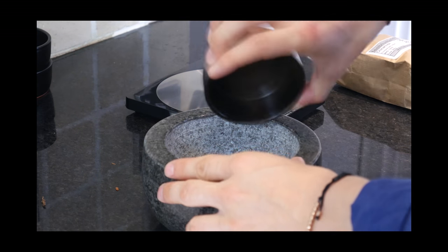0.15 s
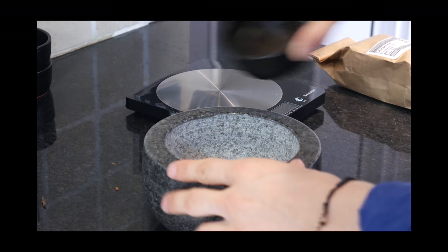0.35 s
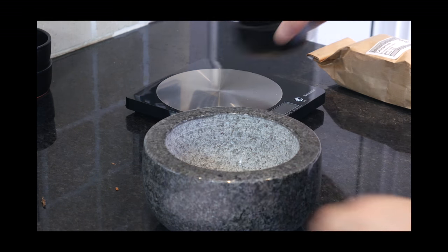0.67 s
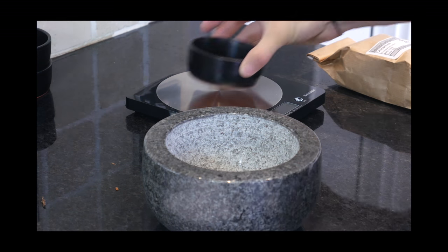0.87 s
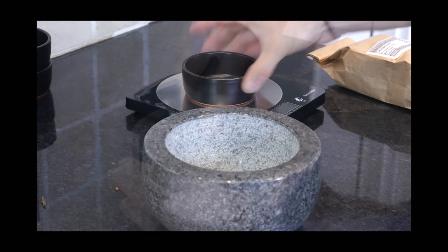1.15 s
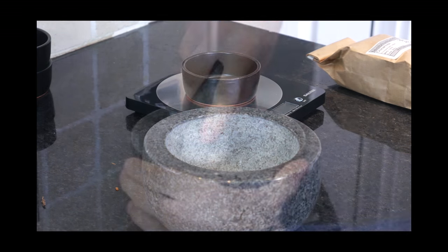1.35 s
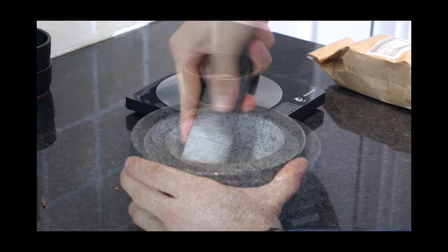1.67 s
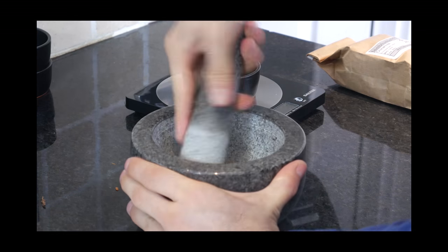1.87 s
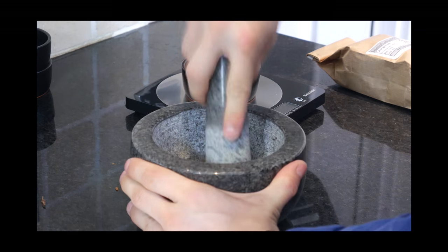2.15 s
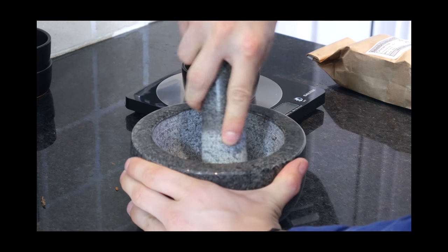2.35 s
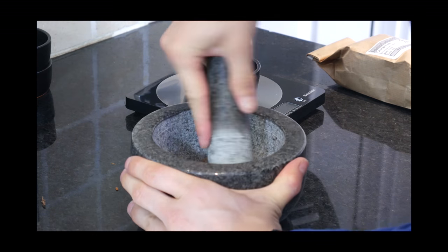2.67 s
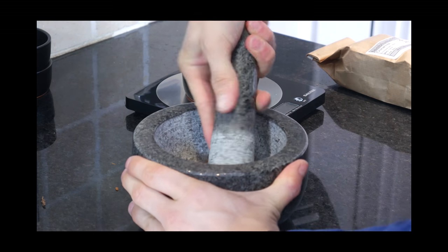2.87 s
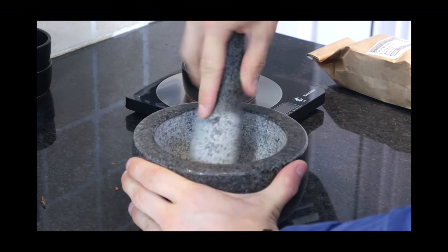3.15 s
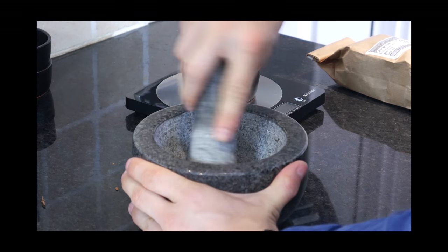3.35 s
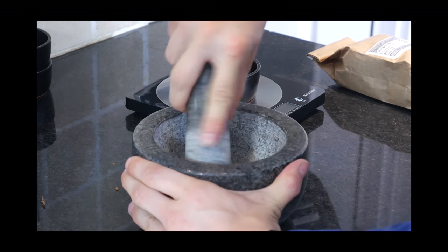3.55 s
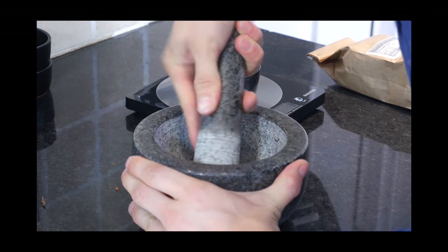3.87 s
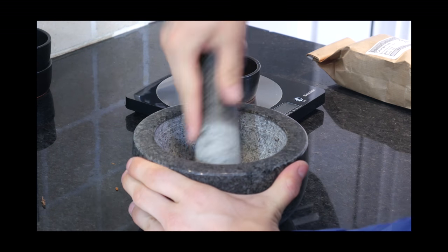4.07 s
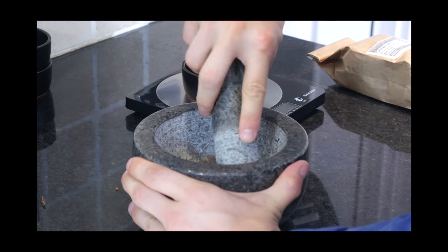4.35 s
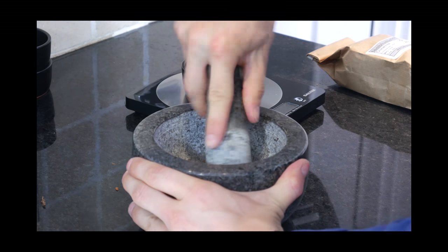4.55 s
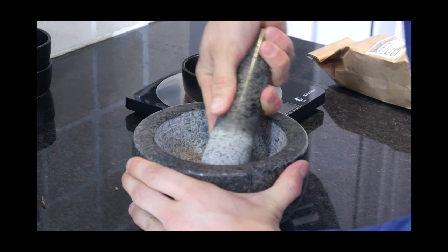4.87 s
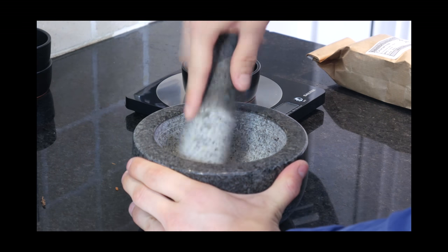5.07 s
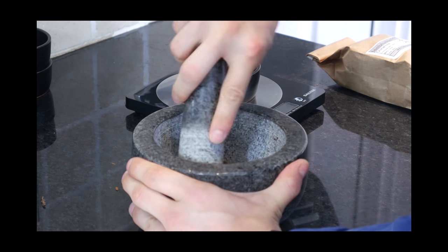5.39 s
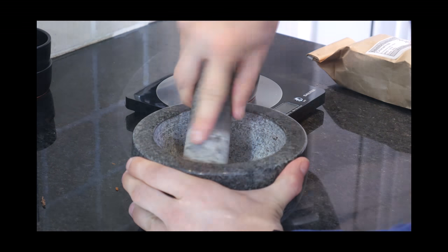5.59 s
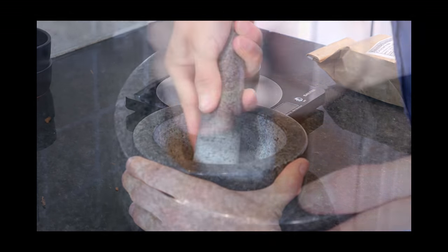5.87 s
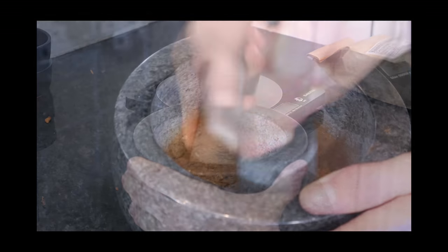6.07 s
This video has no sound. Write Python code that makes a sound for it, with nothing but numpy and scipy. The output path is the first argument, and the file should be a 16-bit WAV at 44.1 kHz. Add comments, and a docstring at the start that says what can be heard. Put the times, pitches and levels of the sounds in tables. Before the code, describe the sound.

Faint room hiss runs throughout in a hard kitchen with a short echo, heard through a nearby stereo microphone. A soft bump comes at about 0.6 seconds, and at 1.1 a small bowl clatters briefly onto a kitchen scale. From 1.5 seconds a stone pestle works dry bark in a stone mortar, starting with light taps and scrapes. The loudest knock, a sharp hollow clack, lands at 2.2 seconds, followed by a strong double knock around 2.8. The blows thump the worktop and make the stone ring slightly. From 3.3 to 5 seconds the knocks are softer and duller, mixed with quiet, lurching rasps and small crackles of bark. Three firmer knocks fall between 5.2 and 5.6 seconds. Gritty grinding carries on to one more thudding knock at about 6 seconds and a last short scrape.

```python
"""Stone mortar and pestle in a kitchen

A small bowl is set down on a kitchen scale; then a stone pestle knocks and grinds dry bark in a stone
mortar. Each contact sounds the mortar's hollow, thumps the worktop and rings the stone. Strokes advance
in lurches: dull and crackling where bark covers the stone, bright and rasping where it is bare.
A wall close behind and the hard room throw it all back to a stereo microphone."""
import sys
import numpy as np
from scipy import signal
from scipy.fft import rfft, irfft
from scipy.io import wavfile
from scipy.ndimage import uniform_filter1d

SR = 44100
rng = np.random.default_rng(int(sys.argv[2]) if len(sys.argv) > 2 else 0)


def wav_out(sig):
    """Save sig, one row per channel (or a flat mono array), as 16-bit PCM at SR to the path in sys.argv[1]."""
    wavfile.write(sys.argv[1], SR, np.round(np.clip(np.atleast_2d(sig).T, -1, 1) * 32767).astype(np.int16))


N = 274302


def amp(db):
    """Decibels to gain."""
    return 10 ** (np.asarray(db) / 20)


def curve(points, hz):
    """A table joined by straight lines over log frequency."""
    f, value = np.transpose(points)
    return np.interp(np.log(hz + 1), np.log(f + 1), value)


def unit(x):
    """Scaled to energy one."""
    return x / np.sqrt(np.sum(x ** 2) + 1e-20)


def add(mix, s, sound):
    """Lays a sound into the mix at time s."""
    part = mix[max(round(s * SR), 0):][:len(sound)]
    part += sound[:len(part)]


def tint(x, points):
    """Filters by a table of gains."""
    return irfft(rfft(x) * amp(curve(points, np.fft.rfftfreq(len(x), 1 / SR))), len(x))


def body(colour, modes=(), lag_s=0.000979, size=8192):
    """Causal click response of a broad colour with resonances on top."""
    signed_hz = np.fft.fftfreq(size, 1 / SR)
    hz = abs(signed_hz)
    db = curve(colour, hz) + sum(lift / (1 + (2 * (hz - f) / width) ** 2) for f, width, lift in modes)
    log_spectrum = np.conj(signal.hilbert(np.log(amp(db))))  # minimum phase
    # bending waves carry the treble first; lag_s is their delay at one kilohertz
    turns = 2 * lag_s * np.sign(signed_hz) * np.sqrt(1000 * hz)
    return unit(np.fft.ifft(np.exp(log_spectrum - 2j * np.pi * turns)).real[:size // 2])


def drive(force, response):
    """A body's answer to a force, at energy one."""
    return unit(signal.fftconvolve(force, response))


def cushioned(response, corner_hz):
    """A softer contact lasts longer and cannot excite the treble."""
    return unit(signal.sosfilt(signal.butter(3, corner_hz, fs=SR, output="sos"), response))


def grains(length_s, per_s, spread_db):
    """Random slips of uneven size under one push that swells quickly and lets go."""
    progress = np.linspace(0, 1, max(int(length_s * SR), 64))
    n = len(progress)
    hit = rng.random(n) < per_s / SR
    size = amp(spread_db * np.minimum(rng.exponential(1, n), 3)) * rng.choice([-1, 1], n)
    push = np.sin(np.pi * progress ** 0.5) ** 2
    return unit(hit * size * push) * np.linalg.norm(push)


def contact(length_s, chatter_db, size=4096):
    """One sharp touch and a brief chatter after it, evened in colour so that it has no pitch."""
    force = amp(chatter_db) * unit(grains(length_s, per_s=3000, spread_db=2))
    force[0] += 1
    flat_spectrum = np.exp(1j * np.angle(rfft(force, size)))
    return unit(irfft(flat_spectrum)[:size // 4])


# room air and hiss at the microphone: f/Hz, relative level/dB
AIR_COLOUR = [(25, -14), (60, -22.5), (95, 5.5), (130, -14.5), (170, -2), (450, -4), (700, -6.5),
              (1200, -11.5), (2500, -15), (6000, -20.5), (12000, -26.5), (16000, -38)]
# how much the two capsules differ in diffuse sound: f/Hz, side level/dB
STEREO_WIDTH = [(40, -23), (90, -4.5), (250, -8), (600, -6.5), (1200, -5.5), (2000, -4), (5000, -7.5),
                (9000, -5.5), (15000, -1.5)]
def room_tone(air_db=-57.5, side_db=3, hum_db=-79, hum_hz=100):
    """Steady air all round the microphone, its own hiss, and a faint mains hum in the centre."""
    mid, side = (amp(air_db) * np.sqrt(N) * unit(tint(noise, AIR_COLOUR))
                 for noise in rng.standard_normal((2, N)))
    side = amp(side_db) * tint(side, STEREO_WIDTH)
    hum = amp(hum_db) * np.sqrt(2) * np.sin(2 * np.pi * hum_hz * np.arange(N) / SR)
    return np.array([mid + side, mid - side]) + hum


# the bowl's clatter on the scale: f/Hz, level/dB
CLATTER_COLOUR = [(60, -48), (230, -10), (400, -17), (650, -12), (860, 1.5), (1300, -9), (1550, -5),
                  (1800, -9), (2300, -5), (2700, -13.5), (4200, -14.5), (7000, -22.5), (10500, -26.5),
                  (15000, -43)]
# its resonances on the plate: f/Hz, width/Hz, lift/dB
CLATTER_MODES = [(750, 17, -3), (865, 17, 6), (1540, 55, 5)]
# the dull bump underneath: f/Hz, level/dB
BUMP_COLOUR = [(40, -27), (150, -2), (330, 11), (550, -14), (1200, -44), (4000, -58)]
# the bowl touching down: t/s, clatter/dB, bump/dB
BOWL_LANDINGS = [(0.6254, -20, -20.5), (1.011, -58, -21.5), (1.0737, 1.5, -23), (1.1234, -1, -29),
                 (1.137, -15, -37)]
def bowl():
    """The bowl lands rim first and chatters briefly on the plate of the scale."""
    out, clatter, bump = np.zeros(N), body(CLATTER_COLOUR, CLATTER_MODES), body(BUMP_COLOUR)
    for s, clatter_db, bump_db in BOWL_LANDINGS:
        add(out, s, amp(clatter_db) * drive(contact(length_s=0.02, chatter_db=2.5), clatter))
        add(out, s, amp(bump_db) * bump)
    return out


# broad colour of the mortar's hollow: f/Hz, level/dB
MORTAR_COLOUR = [(40, -27.5), (120, -24.5), (330, -3.5), (470, -4.5), (620, 3.5), (1000, -5), (1700, 2),
                 (2400, -0.5), (3500, -3.5), (6000, 1.5), (15000, -111)]
# resonances of the mortar standing on the worktop: f/Hz, width/Hz, lift/dB
MORTAR_MODES = [(318, 18, -1.5), (373.2, 16.4, 8), (640.6, 23, 6), (741, 9.5, 4), (790, 16, -4),
                (858, 35, 11), (1025, 89, 9), (1227, 81, 4), (1287, 5.6, 14.5), (1255, 24, -0.5),
                (1646, 120, -3.5), (2350, 110, 3.5), (3170, 230, 5.5)]
def hollow(detune=0.029):
    """Click response of the mortar's hollow, detuned by each new place of the pestle in it."""
    shifts = 1 + detune * rng.uniform(-1.024, 1, len(MORTAR_MODES))
    modes = [(hz * shift, width, lift) for (hz, width, lift), shift in zip(MORTAR_MODES, shifts)]
    return body(MORTAR_COLOUR, modes)


# ringing of the free stone: f/Hz, level/dB, t60/s
STONE_MODES = [(4137, -7.5, 0.071), (4760, 0.5, 0.0079), (5450, 3, 0.0085), (5146, 1.5, 0.037),
               (5302, 2, 0.043), (5940, -6.5, 0.0055), (9400, -9.5, 0.043), (9330, -20, 0.061),
               (12370, -21, 0.047), (12770, -12, 0.021), (13700, -26, .025)]
def stone_ring(loss_db_per_s=0, db_per_octave=0, spread_db=3, detune=0.002):
    """The place of contact weights and shifts the stone's modes; a pressing pestle damps them."""
    t = np.arange(SR // 6) / SR
    ring = np.zeros(len(t))
    for hz, db, t60 in STONE_MODES:
        weight, shift, phase = rng.uniform(-1.05, 1, 3)
        envelope = amp(db + db_per_octave * np.log2(hz) + spread_db * weight - 60 * t / t60)
        ring += envelope * np.sin(2 * np.pi * (hz * (1 + detune * shift) * t + phase))
    return unit(ring * amp(-loss_db_per_s * t))


# thud of the worktop under the mortar: f/Hz, level/dB
THUD_COLOUR = [(25, -65), (60, -14.5), (110, -3.5), (180, -3), (300, 1), (390, -4), (500, -8.5), (900, -31),
               (3000, -41.5)]
# the worktop's resonances: f/Hz, width/Hz, lift/dB
THUD_MODES = [(151.5, 5.2, 4), (185, 9, 9), (247, 6.7, 12.5), (322, 16, 10), (381, 8.9, 9.5)]
# dry bark snapping in the mortar: f/Hz, level/dB
BARK_COLOUR = [(200, -31), (1000, 5.5), (2500, 1), (4500, 0.5), (7000, -1.5), (10000, 0), (12500, -2.5),
               (15500, -17.5)]
# pestle blows: t/s, clack/dB, hardness corner/Hz, thud/dB, thud centre/Hz, ring/dB, crushed bark/dB
BLOWS = [(1.538, -6.5, 674, -15, 263, -17.5, -19), (1.573, -10.5, 1550, -39, 283, -7, -35),
         (2.191, 15, 1640, 0.5, 160, -6.5, -19), (2.766, 6.5, 1270, 5.5, 340, -18.5, -18),
         (2.856, 6.5, 1120, -2.5, 272, -21, -29), (3.324, -44, 300, -8.5, 164, -29, -32),
         (3.706, -7.5, 1330, -11, 352, -16, -15.5), (4.285, -12, 480, 0, 176, -33.5, -28),
         (4.421, -11, 1120, -4, 330, -14, -16.5), (4.526, -40, 600, -8, 189.5, -10, -23),
         (4.842, -12, 1050, -12, 111, -24, -25.5), (5.2188, 3, 1200, -.5, 230, -8.5, -30),
         (5.3523, 9, 1940, -0.5, 195, -8, -38), (5.585, 4.5, 635, -47, 330, -44, -21),
         (5.975, -17, 1190, -10, 90, -20, -19), (6.018, -2.5, 965, 5, 307, -16.5, -27)]
def knocks(rebound_s=0.003764, rebound_db=-10, seat_s=0.00305, rock_s=0.027, rock_db=-13):
    """Each blow sounds the hollow, thumps the worktop, rings the stone and crushes some bark."""
    out, bark = np.zeros(N), body(BARK_COLOUR)
    for s, clack_db, corner_hz, thud_db, thud_hz, ring_db, crush_db in BLOWS:
        cavity = hollow()
        # the heavier the blow, the more the pestle chatters; it lands once more, weaker and softer
        skid = contact(length_s=0.007, chatter_db=-9 + 2.48 * clack_db)
        add(out, s, amp(clack_db) * drive(skid, cushioned(cavity, corner_hz)))
        add(out, s + rebound_s, amp(clack_db + rebound_db) * cushioned(cavity, 0.59 * corner_hz))
        # the mortar seats and rocks back; how it rocks decides which range of the worktop answers
        thud = amp(thud_db) * body(THUD_COLOUR, THUD_MODES + [(thud_hz, thud_hz, 9)])
        add(out, s + seat_s, thud)
        add(out, s + seat_s + rock_s, amp(rock_db) * thud)
        add(out, s, amp(ring_db) * stone_ring(db_per_octave=0.17 * max(clack_db, 0)))
        snaps = grains(length_s=0.027, per_s=1300, spread_db=4.5)
        add(out, s, amp(crush_db) * drive(snaps, bark))
    return out


# strokes in the mortar: t/s, length/s, lurches/count, force/dB, bark cover/0-1, worktop rumble/dB
GRINDING_STROKES = [(1.562, 0.039, 1, -26.5, 0.35, -54), (1.623, 0.13, 2, -23.5, .48, -47),
                    (1.865, 0.16, 2, -41, 0.91, -53), (2.365, 0.064, 1, -39.5, 0, -54),
                    (2.451, 0.026, 1, -15.5, .68, -48), (2.516, 0.056, 1, -25, 0, -42),
                    (2.608, 0.057, 1, -20, 0.57, -37), (2.818, 0.084, 2, -26, 0.85, -44),
                    (3.295, 0.049, 1, -40, 0.98, -50), (3.395, 0.088, 2, -35, 0.77, -42.5),
                    (3.556, .09, 2, -33.5, 0.54, -48.5), (3.647, 0.094, 2, -23.5, .5, -67),
                    (3.804, .14, 3, -26, .06, -49), (3.956, 0.13, 2, -37, 0.5, -44.5),
                    (4.508, 0.077, 1, -26.5, .85, -40), (4.59, 0.17, 3, -26, 0.64, -46.5),
                    (4.753, .12, 2, -28, 0.15, -45), (5.329, 0.051, 1, -34.5, 1, -43),
                    (5.475, 0.23, 4, -28, 0.43, -59), (5.717, 0.15, 1, -33.5, 0.67, -50),
                    (5.787, 0.12, 3, -26.5, 0.09, -37), (5.974, 0.13, 3, -33, 0.85, -33),
                    (6.197, 0.039, 1, -31.5, 0.17, -37)]
def grinding(lurch_step_db=-2.1, overlap=1.16):
    """Trains of slips drive hollow, worktop and stone, and bark snaps, in ever weaker lurches."""
    out, worktop, bark = np.zeros(N), body(THUD_COLOUR, THUD_MODES), body(BARK_COLOUR)
    for s, length_s, lurches, force_db, cover, rumble_db in GRINDING_STROKES:
        # from bare to fully covered: bark muffles the stone and crackles itself
        corner_hz = np.interp(cover, (0, 1), (1176, 570))
        rasp_db = force_db + np.interp(cover, (0, 1), (0, -22))
        ring_db = force_db + np.interp(cover, (0, 1), (-18, -31.5))
        crackle_db = force_db + np.interp(cover, (0, 1), (-34, -14))
        rasp, lurch_s = cushioned(hollow(), corner_hz), length_s / lurches
        for k in range(lurches):
            slips = grains(lurch_s * overlap, per_s=1800, spread_db=4)
            snaps = grains(lurch_s * overlap * 1.09, per_s=1800, spread_db=4.5)
            ring = stone_ring(loss_db_per_s=895)
            strength = amp(k * lurch_step_db) * np.linalg.norm(slips)
            for force, response, db in [(slips, rasp, rasp_db), (slips, worktop, rumble_db),
                                        (slips, ring, ring_db), (snaps, bark, crackle_db)]:
                add(out, s + k * lurch_s, strength * amp(db) * drive(force, response))
    return out


# hiss of fine powder: f/Hz, level/dB
POWDER_COLOUR = [(1000, -36.5), (6000, -8), (9000, -3.5), (11500, 4), (13500, -9), (15500, -11.5)]
# powder sliding under the pestle: t/s, length/s, level/dB
POWDER_SLIDES = [(1.851, 0.027, -60), (2.413, 0.011, -38), (2.72, 0.066, -52), (2.926, 0.027, -56),
                 (3.617, 0.018, -47.5), (4.926, 0.013, -55.5), (5.519, 0.024, -54)]
def powder():
    """Dense, tiny grains hiss as the pestle sweeps them along."""
    out, hiss = np.zeros(N), body(POWDER_COLOUR)
    for s, length_s, db in POWDER_SLIDES:
        add(out, s, amp(db) * signal.fftconvolve(grains(length_s, per_s=9300, spread_db=4), hiss))
    return out


# reverberation of the hard kitchen: f/Hz, t60/s
ROOM_DECAY = [(100, 0.3), (260, 0.42), (700, 0.37), (1800, 0.36), (5000, 0.42), (13000, 0.33)]
def room_tail(onset_s, taps_per_s=4000, size=32768):
    """Dense reflections from farther off, even in colour, each band dying at its own speed."""
    taps = rng.standard_normal(size) * (rng.random(size) < taps_per_s / SR)
    hz, t, bands = signal.stft(taps, SR, nperseg=256)
    decay = amp(-60 * t / curve(ROOM_DECAY, hz)[:, None])
    spectrum = rfft(signal.istft(bands * decay, SR, nperseg=256)[1][:size])
    even = irfft(spectrum / np.sqrt(uniform_filter1d(abs(spectrum) ** 2, size=36)))
    return unit(np.r_[np.zeros(int(onset_s * SR)), even[:size * 3 // 4]])


def reverberate(x, onset_s, sway_s=1.3, tails=3):
    """Moving hands keep changing the paths to the microphone: the sound passes round several tails."""
    turn = np.arange(N) / SR / sway_s
    shares = np.array([np.maximum(np.cos(2 * np.pi * (turn + k / tails)), 0) for k in range(tails)])
    shares /= np.linalg.norm(shares, axis=0)
    return sum(signal.oaconvolve(x * share, room_tail(onset_s))[:N] for share in shares)


# walls close by (the back of the mortar radiates in opposite sign): delay/s, signed gain
WALL_ECHOES = [(.00404, -0.28), (.0052, 0.36), (0.0176, .18), (0.0215, -0.32)]
def kitchen(x, wet_db=-1, side_db=-1.5):
    """Direct sound and near walls reach the microphone centred; only the reverberation spreads wide."""
    near = np.zeros(SR // 20)
    near[0] = 1
    for delay_s, gain in WALL_ECHOES:
        near[round(delay_s * SR)] += gain
    mid = signal.oaconvolve(x, near)[:N] + amp(wet_db) * reverberate(x, onset_s=0.007)
    side = amp(wet_db + side_db) * reverberate(tint(x, STEREO_WIDTH), onset_s=0.0023)
    return np.array([mid + side, mid - side]) / np.hypot(np.linalg.norm(near), amp(wet_db))


def scene():
    """Pestle and bowl as heard from the microphone's place in the kitchen, over the room tone."""
    sources = knocks() + grinding() + powder() + bowl()
    return kitchen(amp(4.5) * sources) + room_tone()


# the microphone's lean towards its left capsule: f/Hz, left minus right/dB
CAPSULE_LEAN = [(60, 1.5), (250, -1), (600, -1.5), (1300, 0.6), (4000, -0.1), (14000, 0.5)]
def record(dry, edge_hz=15800):
    """The capsules colour the sides slightly apart; peaks clip at full scale; then the band limit."""
    left = tint(dry[0], [(hz, db / 2) for hz, db in CAPSULE_LEAN])
    right = tint(dry[1], [(hz, -db / 2) for hz, db in CAPSULE_LEAN])
    lowpass = signal.firwin(511, edge_hz, window=("kaiser", 9), fs=SR)
    return signal.oaconvolve(np.clip([left, right], -1, 1), lowpass[None], "same")


dry = scene()
out = record(dry)
wav_out(out)
```